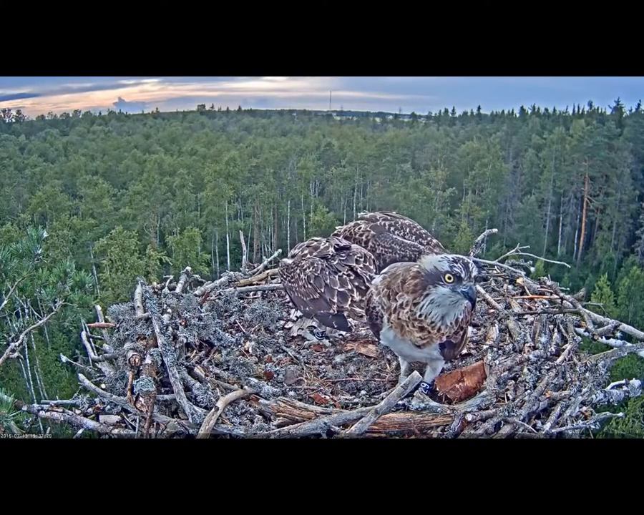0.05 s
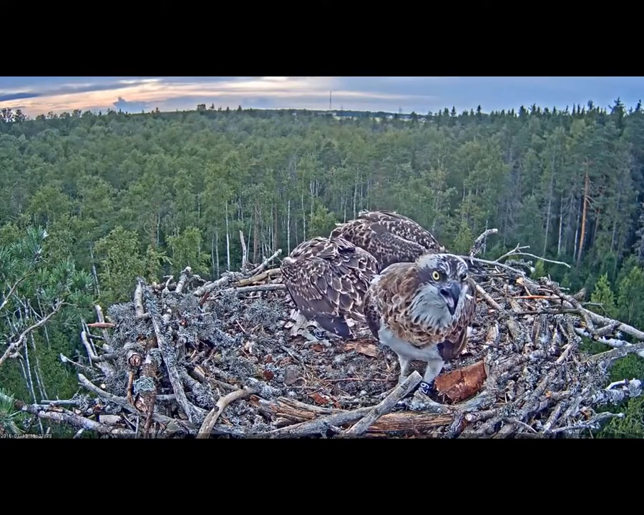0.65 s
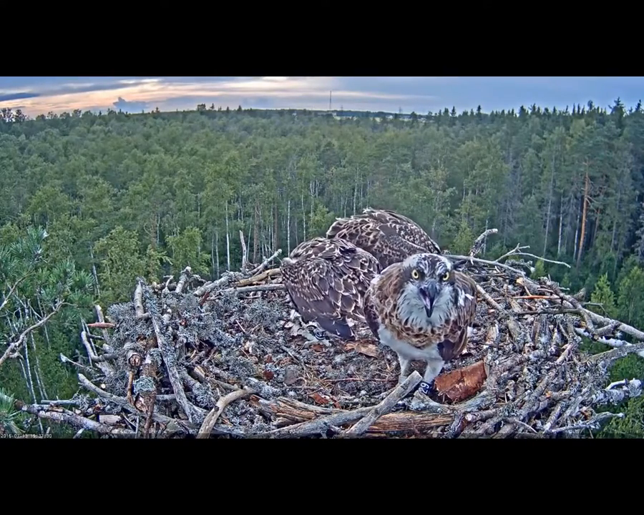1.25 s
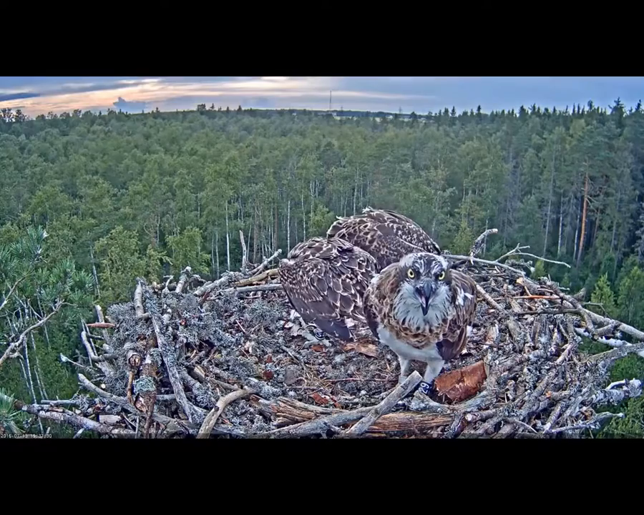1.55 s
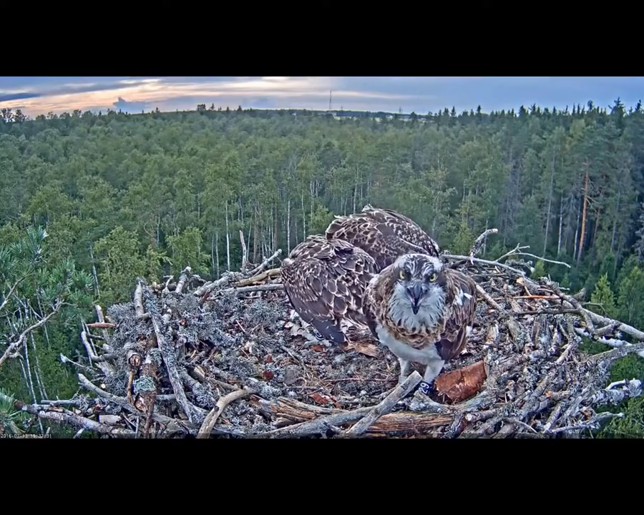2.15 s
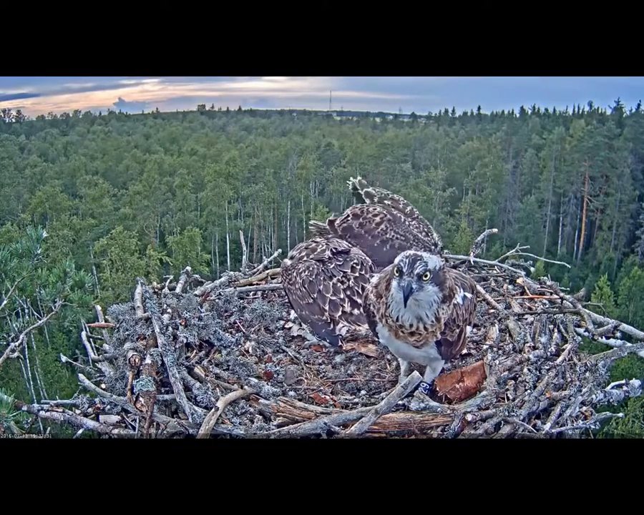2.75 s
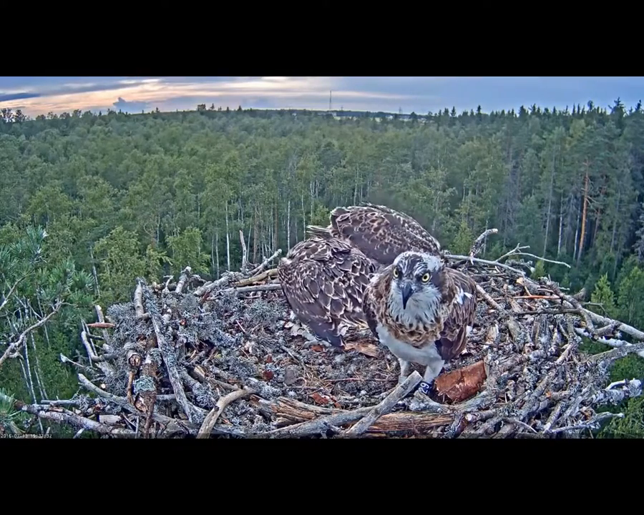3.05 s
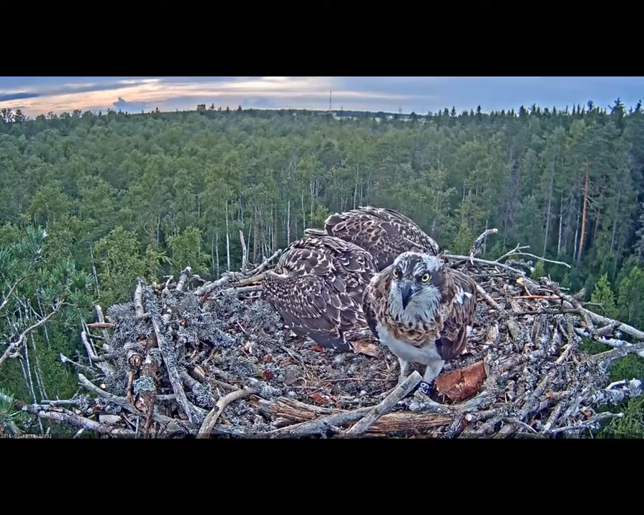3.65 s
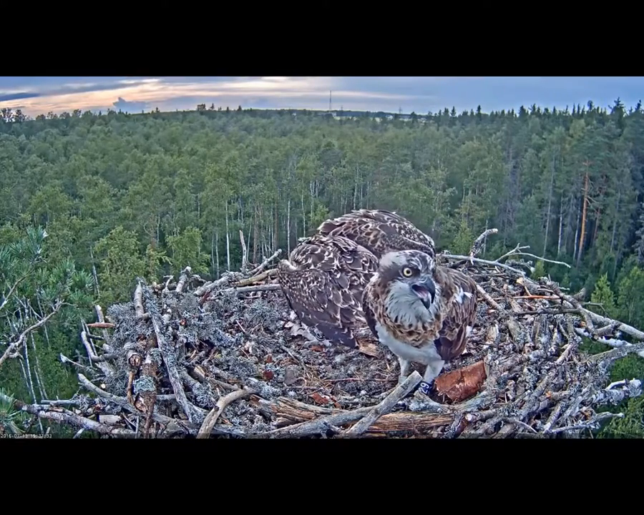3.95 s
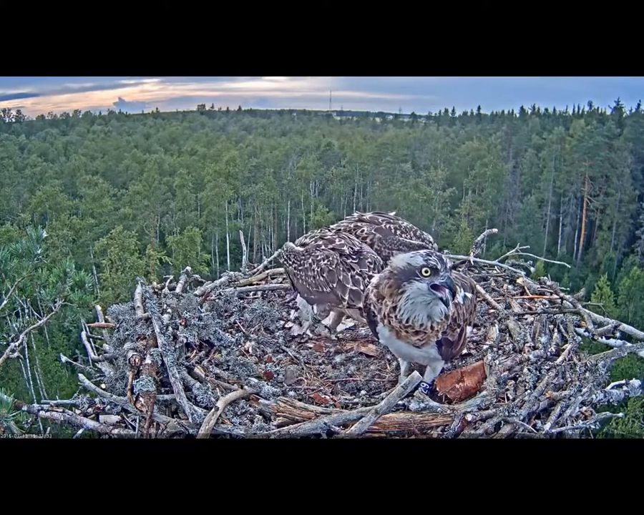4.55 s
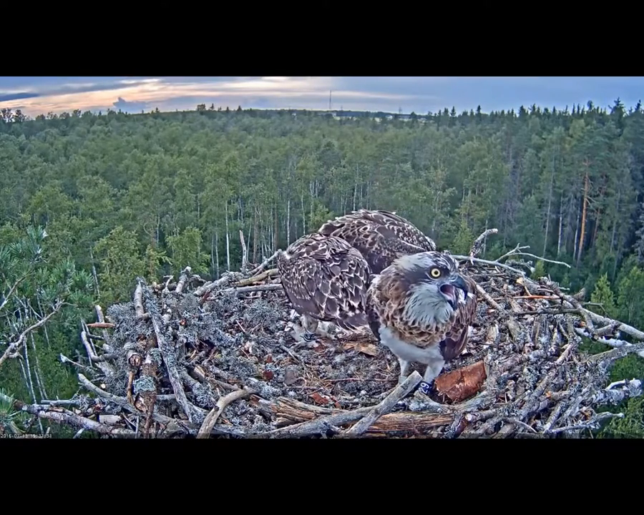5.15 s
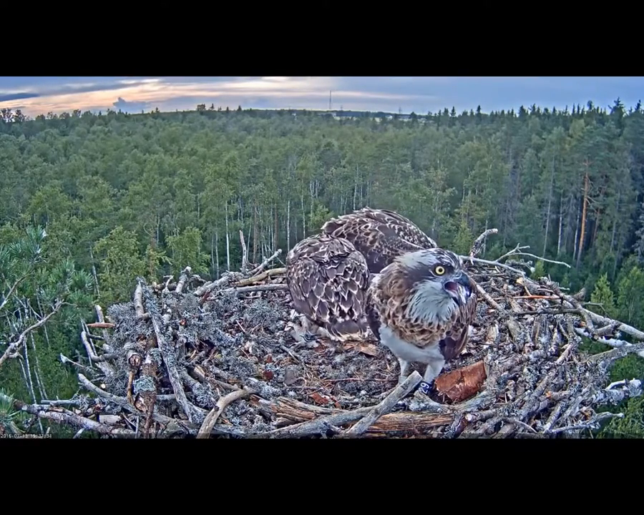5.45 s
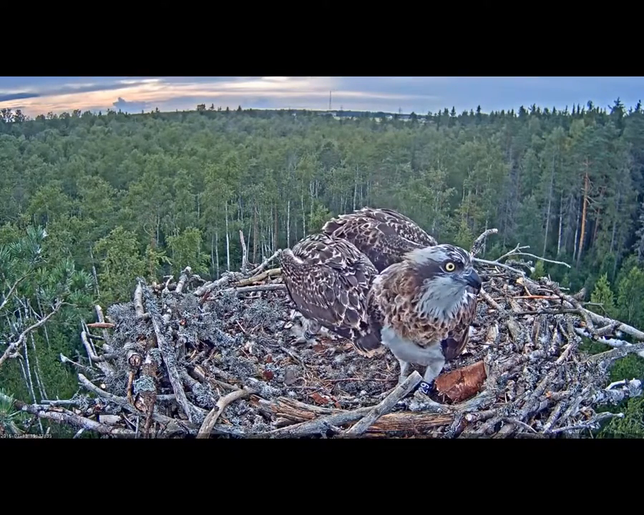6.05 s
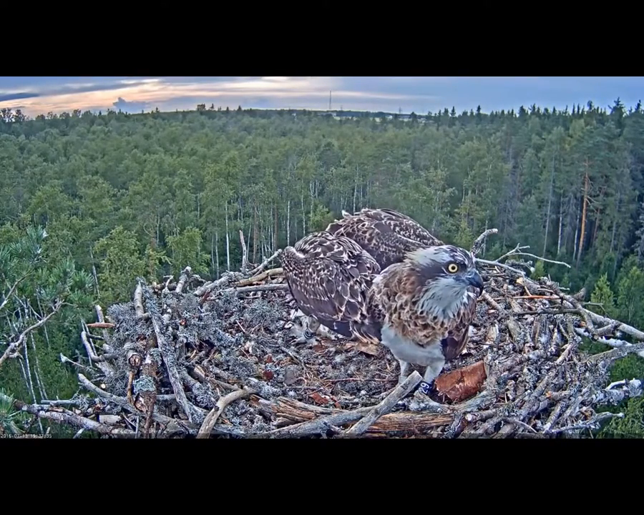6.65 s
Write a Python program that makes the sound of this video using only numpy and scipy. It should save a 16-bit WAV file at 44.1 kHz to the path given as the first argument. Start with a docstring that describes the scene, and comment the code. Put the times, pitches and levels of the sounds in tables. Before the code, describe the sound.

An osprey calls close to the microphone from a stick nest in a forest. It gives a run of about twelve short, high piping whistles, pauses for a second, then gives another run, slightly higher. Many notes crack upward with a slight rasp. Faint foot knocks and twig ticks come from the nest, and a second bird shuffles once in the pause. A faint echo trails the calls over a low rumble of air.

```python
"""Osprey calling from its nest

Two bouts of piping whistles sound close by. Each note arches in pitch, most after a soft bill click; many crack
into the syrinx's upper register and drop back as they end. The forest returns a long faint echo over a low
rumble of air. Feet knock on the nest, twigs tick, and a brief gust buffets the microphone once."""
import sys
import numpy as np
from scipy import signal
from scipy.fft import rfft, irfft
from scipy.io import wavfile
from scipy.ndimage import map_coordinates

SR = 44100
rng = np.random.default_rng(int(sys.argv[2]) if len(sys.argv) > 2 else 0)


def wrap_up_sound(samples):
    """Save the sound to the file named by the first command line argument, as 16-bit audio."""
    columns = np.atleast_2d(samples).T
    # keep every value between -1 and 1, then stretch to whole-number steps
    tamed = np.clip(columns, -1, 1)
    steps = np.round(tamed * 32767).astype(np.int16)
    wavfile.write(sys.argv[1], SR, steps)


N = 304290
TIME_S = np.arange(N) / SR
CREST_SHARE = 0.4841  # of a note's length, where its pitch peaks

# whistled notes: start/s, length/s, top f/Hz, level/dB
NOTES = [(.221, 0.1028, 2634, -17.5), (0.4038, 0.08518, 2605, -13.5), (0.5833, 0.08663, 2662, -13.5),
         (0.774, 0.0826, 2629, -12), (0.9653, 0.08923, 2631, -12), (1.1469, 0.0914, 2623, -12.5),
         (1.3348, 0.09185, 2656, -12), (1.5263, 0.09027, 2653, -12), (1.7145, 0.0913, 2645, -12),
         (1.906, 0.09284, 2661, -12.5), (2.0979, 0.08663, 2664, -12), (2.3077, 0.09004, 2638, -13),
         (3.5375, 0.12183, 2631, -17), (3.7318, 0.0932, 2666, -12), (3.9138, 0.09103, 2707, -12),
         (4.098, 0.09383, 2699, -11.5), (4.2878, 0.09747, 2700, -11.5), (4.4762, 0.09993, 2699, -12),
         (4.6653, 0.1075, 2736, -12), (4.853, 0.1061, 2750, -12), (5.0427, 0.10205, 2767, -11.5),
         (5.2317, 0.09855, 2749, -12.5), (5.424, 0.0952, 2698, -13), (5.647, 0.0993, 2659, -13.5)]


def undb(db):
    """Decibels to gain."""
    return 10 ** (np.asarray(db) / 20)


def ease(x):
    """Smooth step from 0 to 1."""
    return np.sin(np.pi / 2 * np.clip(x, 0, 1)) ** 2


def gain_at(spectrum, hz):
    """Gain at hz of a spectrum given as f/Hz, level/dB."""
    f, db = np.transpose(spectrum)
    return undb(np.interp(np.log(np.maximum(hz, 1)), np.log(f), db))


def noise(spectrum, n):
    """Unit-rms noise shaped by a spectrum given as f/Hz, level/dB."""
    hz = np.arange(n // 2 + 1) * SR / n
    x = irfft(rfft(rng.standard_normal(n)) * gain_at(spectrum, hz), n)
    return x / x.std()


def wander(rate_hz, n):
    """Smooth random curve, spread near 1."""
    knots = np.arange(n) * rate_hz / SR
    return map_coordinates(rng.standard_normal(int(knots[-1]) + 2), [knots], order=3, mode="nearest")


def add(track, start_s, sound):
    """Mix a sound into a track."""
    i = int(start_s * SR)
    track[i:i + len(sound)] += sound[:N - i]


def air(level_db=-56.5, breeze_top_hz=1500, hum_hz=125.4, hum_db=-69.5):
    """A breeze swells the rumble and a faint wavering hum; the hiss above stays steady."""
    # air over the forest: f/Hz, level/dB
    spectrum = [(20, 3.5), (50, -6), (100, -11), (200, -17.5), (400, -22), (750, -25.5), (1100, -34.5),
                (1700, -41.5), (3500, -43.5), (8000, -46), (14000, -47.5)]
    # breeze strength: t/s, gain/dB
    breeze = [(0, -1), (.4, 1.5), (2.2, 1), (2.55, -3), (3.5, 1.5), (5.7, 1.5), (6.9, 0)]
    still = noise(spectrum, N) * undb(level_db)
    rumble = signal.sosfiltfilt(signal.butter(2, breeze_top_hz, fs=SR, output="sos"), still)
    hiss = (still - rumble) * undb(0.5)
    hum_phase = 2 * np.pi * np.cumsum(hum_hz + 3 * wander(8.2, N)) / SR
    hum = np.sin(hum_phase) * undb(hum_db + 3 * wander(5.4, N))
    swell = undb(np.interp(TIME_S, *np.transpose(breeze)))
    return (rumble * undb(1.2 * wander(4.9, N)) + hum) * swell + hiss


def blows(events, modes, contact_s):
    """Soft blows ring damped modes, slightly detuned each time."""
    out, t = np.zeros(N), TIME_S[:SR // 20]
    for start_s, level_db in events:
        ring = 0
        for hz, mode_db, t60_s in modes:
            detuned_hz = hz * (1 + 0.011 * rng.standard_normal())
            ring += undb(mode_db - 60 * t / t60_s) * np.sin(2 * np.pi * detuned_hz * t)
        add(out, start_s, undb(level_db) * ring * ease(t / contact_s))
    return out


def feet():
    """Shifting feet knock on the nest's sticks."""
    # knocks: t/s, level/dB
    knocks = [(.197, -48.5), (3.298, -55.5), (3.364, -45.5), (3.503, -47.5), (3.513, -54), (5.798, -44.5),
              (6.031, -37.5)]
    # stick modes: f/Hz, level/dB, t60/s
    stick_modes = [(635, 5.5, 0.0121), (976, -3, 0.0187), (1730, -13.5, 0.037), (2030, -9.5, 0.016),
                   (3120, -17.5, 0.012)]
    return blows(knocks, stick_modes, contact_s=0.0026)


def membrane_phase(hz, jitter):
    """Running phase of a membrane whose pitch trembles."""
    return 2 * np.pi * np.cumsum(hz * (1 + jitter * wander(1400, len(hz)))) / SR


def lead_in(to_hz, from_hz=2100, length_s=0.0239, level_db=-56.5):
    """A faint airy tone slides up into a note while pressure builds."""
    u = np.linspace(0, 1, int(length_s * SR))
    phase = membrane_phase(from_hz + (to_hz - from_hz) * u ** 2, jitter=.04)
    return undb(level_db) * ease(u / 0.12) * ease((1 - u) / 0.17) * np.sin(phase)


def arch(u, first=0.9082, last=0.8272):
    """Pitch as a share of the top, for u from 0 to 1: a rounded rise, then a steepening fall."""
    rise = first + (1 - first) * np.sin(np.pi / 2 * u / CREST_SHARE)
    fall = 1 - (1 - last) * ((u - CREST_SHARE) / (1 - CREST_SHARE)) ** 2
    return np.where(u < CREST_SHARE, rise, fall)


def rasp(n, depth_db):
    """A fast-trembling gain that fringes a partial with patchy noise."""
    patches = undb(4.7 * np.tanh(wander(70, n)))
    tremble = noise([(80, -7.5), (350, -2), (600, -5), (780, -15.5), (1200, -47.0)], n)
    return 1 + undb(depth_db) * patches * tremble


def overtones(phase, hz, series, flutter_db, rasp_db):
    """Unsteady overtones sweep through the throat's resonances; higher ones rasp more."""
    # throat and bill response: f/Hz, gain/dB
    throat = [(3500, 3), (4500, -18.5), (5250, -11), (5650, -17), (6200, -32.5), (6950, -15), (7650, -22.5),
              (8000, -30), (8600, -54), (9700, -21.5), (10050, -31.5), (10400, -50), (12500, -46.5),
              (13900, -47)]
    n, out = len(hz), 0
    for k, db in series:
        gain = undb(db + flutter_db * wander(160, n)) * rasp(n, rasp_db + 4.3 * k)
        out += gain * gain_at(throat, k * hz) * np.sin(k * phase)
    return out


def note(start_s, length_s, top_hz, level_db, full_voice_db=-11.5, release_s=0.01714, return_s=0.01507):
    """One arched whistle in the syrinx's first mode, with its crack if it has one."""
    # timbre, brightening through each bout: t/s, overtone gain/dB, dip at the crest/dB
    voice = [(.25, -9.5, 0.5), (.45, -5.5, 4), (1.201, -4, 1), (1.599, 1.5, 4), (2.35, 2, 2),
             (3.6, -8, -1.5), (3.95, -0.5, 2.5), (4.9, -2.5, 2.5), (5.3, 0.5, -0.5)]
    # cracks into the upper register: t/s, top f/Hz, level/dB
    cracks = [(0.2746, 3173, -12.5), (0.433, 3179, -11.5), (0.6118, 3207, -12.5), (1.0032, 3228, -12.5),
              (1.1865, 3245, -13), (1.3671, 3252, -13), (3.608, 3264, -16), (3.7611, 3287, -14.5),
              (4.3436, 3395, -12), (4.5139, 3355, -14), (4.6957, 3413, -14), (4.8884, 3443, -14),
              (5.0813, 3471, -12.5)]
    # lower-register overtones: multiple, level/dB
    series = [(2, 1.5), (3, -9), (4, -12), (5, -14)]
    # syrinx turbulence coloured by the throat: f/Hz, level/dB
    turbulence = [(300, -13), (1300, -11.5), (2000, -2), (3200, 2.5), (3900, -13), (4250, -21), (4700, 2.5),
                  (5900, -4), (6400, -18), (7600, -7.5), (8700, -33.5), (10000, -17.5), (11200, -42),
                  (12000, -48.5), (13000, -35.5), (13800, -48)]
    n = int(length_s * SR)
    t = start_s + np.arange(n) / SR
    u, end_s = (t - start_s) / length_s, start_s + length_s
    times_s, *columns = np.transpose(voice)
    bright_db, dip_db = (np.interp(start_s + length_s / 2, times_s, column) for column in columns)
    hz = top_hz * arch(u)
    phase = membrane_phase(hz, jitter=0.00088)
    attack_s = 0.00746 * 2 ** (max(full_voice_db - level_db, 0) / 7)  # soft notes speak slowly
    gate = ease((t - start_s) / attack_s) * ease((end_s - t) / release_s)
    crest = ease(1 - np.abs(u - CREST_SHARE) / 0.28)
    low_gain = gate * undb(level_db - dip_db * crest + 0.9 * wander(90, n))
    high_gain, cracked = 0, 0
    for crack in cracks:
        crack_s = crack[0]
        if start_s < crack_s < end_s:
            high, high_phase, high_gain, low_share = upper_register(t, u, *crack, end_s - return_s)
            # the first mode falters before the crack and returns weakened
            falter_db = -2 * ease(1 + (t - crack_s) / .018)
            low_gain *= low_share * undb(np.where(t < (crack_s + end_s) / 2, falter_db, -2.5))
            # overlapping modes breed combination tones
            sum_tone = undb(-2.5) * np.sin(phase + high_phase)
            difference_tone = undb(4.0) * np.sin(2 * phase - high_phase)
            cracked = high + low_gain * high_gain * (sum_tone + difference_tone)
    # gated twice: overtones need full pressure
    bright = gate * undb(bright_db) * overtones(phase, hz, series, flutter_db=2.0, rasp_db=-33)
    whistle = np.sin(phase) * rasp(n, depth_db=-40.0) + bright
    # the flow is most turbulent at the onset
    rush_db = -46.5 + 15 * np.exp(-(t - start_s) / .02) + 4.1 * wander(88, n)
    rush = undb(rush_db) * noise(turbulence, n)
    return low_gain * whistle + cracked + (low_gain + high_gain) * rush


def upper_register(t, u, start_s, top_hz, level_db, end_s, grow_s=.004, handover_s=.005, droop=0.49):
    """The syrinx's second mode; returns sound, phase, gain and the share left to the first mode."""
    # half-pitch undertone through the throat: f/Hz, level/dB
    undertone_response = [(1585, -20), (1625, -12), (1730, -10)]
    # upper-register overtones: multiple, level/dB
    series = [(1.5, -8), (2, 1.5), (2.5, -4), (3, -5.5), (4, -18.5)]
    n, length_s = len(t), end_s - start_s
    age_s, left_s = t - start_s, end_s - t
    hz = top_hz * (1 - droop * (u - .56) ** 2)
    phase = membrane_phase(hz, jitter=0.0017)
    grow = .5 + .5 * np.tanh(age_s / grow_s)
    # brief cracks sag most
    sag_db = -13 * np.exp((0.025 - length_s) / 0.014) * np.clip(age_s / length_s, 0, 1) ** 2
    gain = grow * ease((left_s + 0.0034) / 0.0082) * undb(level_db + sag_db)
    # once settled, cycles alternate strong and weak
    settled = ease((age_s - .001) / 0.0094) * ease(left_s / 0.01)
    undertone = settled * gain_at(undertone_response, top_hz / 2) * np.sin(phase / 2)
    bright_gate = grow * ease((left_s + .003) / 0.011)
    bright = bright_gate * overtones(phase, hz, series, flutter_db=4.5, rasp_db=-28)
    # the jump is briefly chaotic
    scrape = noise([(500, -15), (3000, 2), (3700, 2.5), (4200, -10.5), (6500, -0.5),
                    (8600, -24), (9800, -8), (11500, -42), (13000, -49)], n)
    scrape *= undb(-22.5) * np.exp(-np.abs(age_s - .001) / 0.0018)
    # the first mode stays restless underneath
    growl_gain = undb(-39 + 3 * wander(100, n))
    growl = growl_gain * noise([(300, -17.5), (1300, -16.5), (2000, -8), (2450, 1), (2900, -6),
                                (4200, -27.5), (8000, -50.5)], n)
    sound = np.sin(phase) + undertone + bright + scrape + growl
    low_share = 1 - ease((age_s + handover_s) / (handover_s + .0055)) + ease((.003 - left_s) / 0.0089)
    return gain * sound, phase, gain, low_share


def osprey(lead_s=.014):
    """Both bouts of whistles, each note overlapping its lead-in."""
    out = np.zeros(N)
    for start_s, length_s, top_hz, level_db in NOTES:
        add(out, start_s - lead_s, lead_in(to_hz=top_hz * arch(0)))
        add(out, start_s, note(start_s, length_s, top_hz, level_db))
    return out


def forest(x, near_db=-27.5, near_decay_s=0.0099, far_db=-47.0, body_t60_s=1.5, treble_t60_s=0.87):
    """Nest and tree scatter the sound at once; distant trunks return a long tail."""
    n = 2 * SR
    t = TIME_S[:n]
    near = noise([(1500, -6), (2500, -3.5), (5000, -1.5), (8000, 4)], n)
    near *= ease((t - .004) / 0.016) * np.exp(-t / near_decay_s)
    body = noise([(1600, -19), (2600, -5.5), (3300, -7.5), (4500, -20)], n)
    treble = noise([(3300, -23.5), (5200, 1.5), (6400, 11.5), (7300, -6), (10000, -12.0)], n)
    far = body * undb(-60 * t / body_t60_s) + treble * undb(5.5 - 60 * t / treble_t60_s)
    far *= ease(t / 0.024)
    response = undb(near_db) * near / np.linalg.norm(near) + undb(far_db) * far / np.linalg.norm(far)
    return signal.fftconvolve(x, response)[:N]


def bill(level_db=-36, scatter_db=2.16, bout_gap_s=.5):
    """The bill clicks open ahead of every note but the first of a bout."""
    # modes of the opening mouth: f/Hz, level/dB, t60/s
    mouth_modes = [(190, -6.5, 0.018), (312.3, -0.5, 0.013), (838, 4, 0.0097), (1832, -0.5, 0.026),
                   (2129, -8, 0.003)]
    # click ahead of its note: top f/Hz, lead/s
    leads = [(2610, 0.017), (2770, .0138)]
    starts_s, _, top_hz, _ = np.transpose(NOTES)
    clicks_s = starts_s - np.interp(top_hz, *np.transpose(leads))
    clicks_s = clicks_s[1:][np.diff(starts_s) < bout_gap_s]
    levels_db = level_db + scatter_db * rng.standard_normal(len(clicks_s))
    return blows(zip(clicks_s, levels_db), mouth_modes, contact_s=0.0012)


def twigs(decay_s=.001, faint_per_span=4, faint_db=-61, scatter_db=1):
    """Dry twigs snap: a few clear ticks, and faint random ones as the nest settles."""
    # clear ticks: t/s, level/dB
    ticks = [(2.779, -55), (4.984, -53), (5.381, -52.5), (6.434, -58), (6.504, -59)]
    # settling spans: from/s, to/s
    settling = [(2.7, 3.45), (6.2, 6.55)]
    out, t = np.zeros(N), TIME_S[:SR // 50]
    faint = [(rng.uniform(*span), rng.normal(faint_db, scatter_db))
             for span in settling for _ in range(faint_per_span)]
    for start_s, level_db in ticks + faint:
        snap = noise([(2000, -12), (6000, -9.5), (12000, -7.5)], len(t))
        add(out, start_s, undb(level_db) * np.exp(-t / decay_s) * snap)
    return out


def mic_gust(at_s=2.8, sway_s=.3, sway_db=-53.5, brush_s=0.043, brush_db=-73.5):
    """A gust buffets the microphone: a low rumble swells and fades, with a faint patchy brush of air."""
    sway = noise([(20, 1), (55, -1.0), (110, -20), (400, -59.5)], N)
    sway *= undb(sway_db) * np.exp(-((TIME_S - at_s) / sway_s) ** 2)
    brush_gain = undb(brush_db + 4.4 * wander(70, N)) * np.exp(-((TIME_S - at_s) / brush_s) ** 2)
    return sway + brush_gain * noise([(1500, -18.5), (5000, -3), (13000, -1.0)], N)


def scene():
    """Bird, nest, the bird's echo and the air, in mono."""
    bird = osprey() + bill()
    nest = feet() + twigs() + mic_gust()
    return (bird + nest + forest(bird) + air())[None]


def record(dry):
    """The microphone cuts the top treble and rests slightly off zero."""
    cutoff_hz, dc_offset = 13950, .0133
    return signal.sosfilt(signal.ellip(8, .2, 70, cutoff_hz, fs=SR, output="sos"), dry) + dc_offset


dry = scene()
out = record(dry)
wrap_up_sound(out)
```